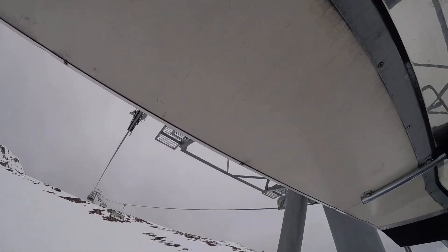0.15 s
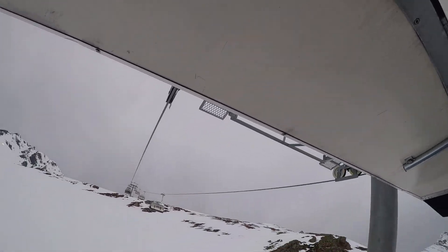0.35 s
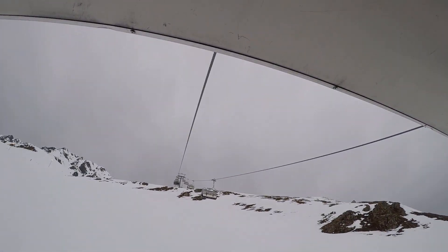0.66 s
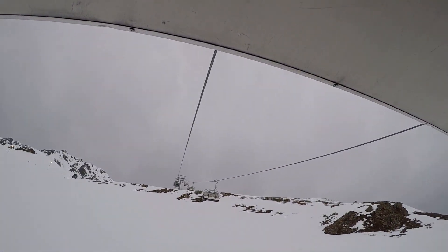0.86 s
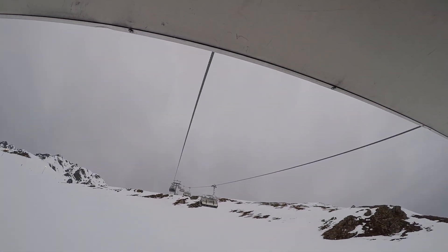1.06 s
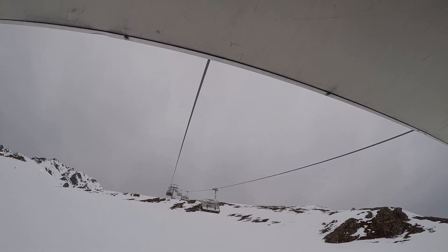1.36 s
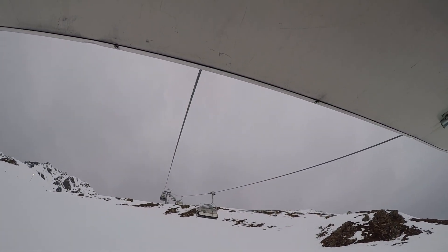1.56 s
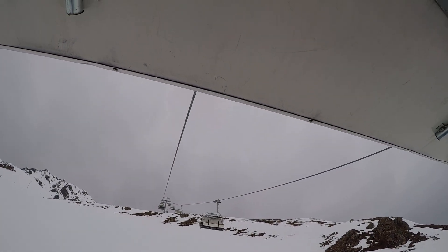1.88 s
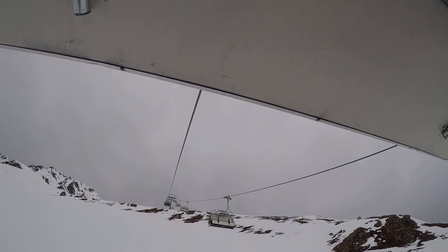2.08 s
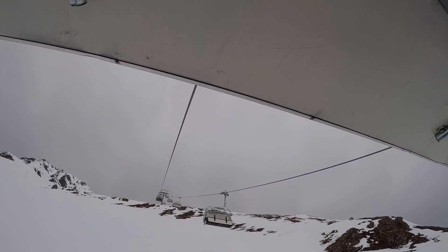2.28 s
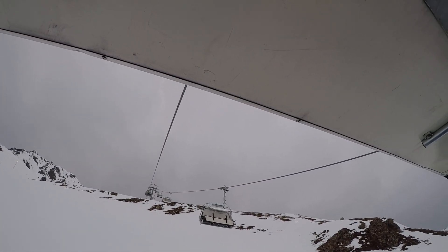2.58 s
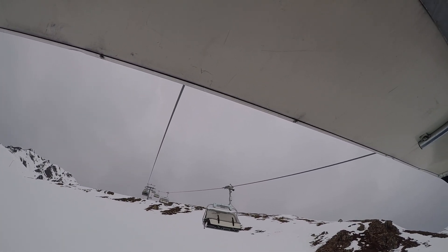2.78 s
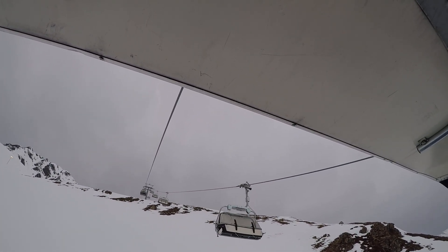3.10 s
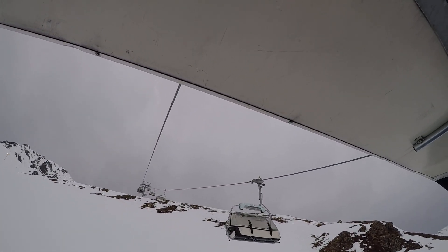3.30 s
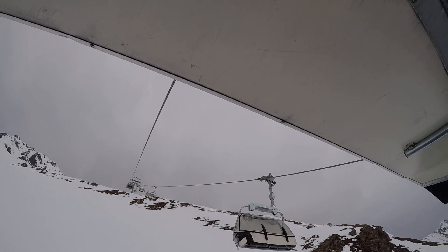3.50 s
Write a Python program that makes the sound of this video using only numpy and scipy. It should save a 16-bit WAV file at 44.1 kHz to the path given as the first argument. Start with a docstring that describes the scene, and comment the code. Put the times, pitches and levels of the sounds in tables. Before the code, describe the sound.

A chairlift chair, heard from the seat under its hood, rumbles over tower wheels with rushing noise, thuds and metallic rattles; after about 1.4 seconds it calms, snaps once, then hums faintly in open air.

```python
"""A chairlift chair is heard from its seat under the hood, shaken and rung by jolts over a tower's wheels.
Shaped noise makes the rush, rumble and air; loose fittings add rattles, ticks, pings and clanks.
Past the tower a fitting snaps once and the chair shudders.
Then the cable hums as a wavering sine in quiet open air, with a few faint squeaks of short rough tones."""
import sys
import numpy as np
from scipy import signal
from scipy.fft import rfft, irfft
from scipy.io import wavfile

SR = 44100
rng = np.random.default_rng(int(sys.argv[2]) if len(sys.argv) > 2 else 0)


def unload_wav(signal):
    """Save mono or channel-first audio to the path in sys.argv[1] as 16-bit WAV at rate SR, clipped to [-1, 1]."""
    wavfile.write(
        sys.argv[1],
        SR,
        np.round(np.clip(np.atleast_2d(signal).T, -1, 1) * 32767).astype(np.int16),
    )


N = 160965


def amp(db):
    """Turns decibels into gain."""
    return 10 ** (np.asarray(db) / 20)


def unit(x):
    """Scales a signal to rms 1."""
    return x / np.sqrt(np.mean(x ** 2) + 1e-20)


def read(points, hz):
    """Reads a table on a log-frequency axis."""
    f, value = np.transpose(points)
    return np.interp(np.log(hz + 1), np.log(f + 1), value)


def clock():
    """Gives the time of every sample in seconds."""
    return np.arange(N) / SR


def level(points):
    """Gives the gain that follows a level curve."""
    return amp(np.interp(clock(), *np.transpose(points)))


def drift(rate_hz):
    """Wanders at random with rms 1: noise under a Gaussian low-pass."""
    hz = np.fft.rfftfreq(N, 1 / SR)
    lowpass = np.exp(-(hz / rate_hz) ** 2)
    return unit(irfft(rfft(rng.standard_normal(N)) * lowpass, N))


def grain(rate_hz, depth_db):
    """Makes contact uneven: a random gain of rms 1."""
    return unit(amp(depth_db * np.clip(drift(rate_hz), -2, 2)))


def burst(start, length, rise, fall):
    """Shapes one event: linear attack, hold and exponential release, all in seconds."""
    t = clock() - start
    return np.clip(t / rise, 0, 1) * np.exp(-np.maximum(t - length, 0) / fall)


# Left-right likeness of the noise: f/Hz, correlation
STEREO_LIKENESS = [(130,.97),(300,.85),(600,.15),(1200,.15),(3000,.55),(8000,-.15)]
# Left-right balance of the noise: f/Hz, left minus right level/dB
STEREO_BALANCE = [(70,-1),(330,3.5),(1100,-2),(5000,1.5),(9000,-2.5)]


def noise(spectrum=None):
    """Makes stereo noise, white or coloured, from a shared mid and an opposed side."""
    hz = np.fft.rfftfreq(N, 1 / SR)
    mid, side = np.exp(2j * np.pi * rng.random((2, len(hz))))
    alike = np.clip(read(STEREO_LIKENESS, hz), -.99, .99)
    tilt_db = read(STEREO_BALANCE, hz) / 2
    mid, side = mid * np.sqrt(1 + alike), side * np.sqrt(1 - alike)
    bins = np.array([(mid + side) * amp(tilt_db), (mid - side) * amp(-tilt_db)])
    colour = 1 if spectrum is None else amp(read(spectrum, hz))
    return unit(irfft(bins * colour, N))


def ring(drive, modes):
    """Rings decaying modes (f/Hz, width/Hz, relative level/dB), keeping the power of a white drive."""
    t = np.arange(SR // 3) / SR
    response = np.zeros(len(t))
    for k, (hz, width, db) in enumerate(modes):
        decay = np.sqrt(width) * np.exp(-np.pi * width * t)
        # neighbouring modes alternate in sign
        response += (-1) ** k * amp(db) * decay * np.sin(2 * np.pi * hz * t)
    return signal.fftconvolve(drive, response[None] / np.linalg.norm(response), axes=1)[:, :N]


JOLT_RISE_S, JOLT_FALL_S = 0.0046, 0.01
THUD_DB, BUMP_DB, CHAIR_DB = -6.5, -14.5, -22.5
# Jolts that shake the chair: t/s, relative level/dB, length/s
JOLTS = [(0.093,-13,0.021),(.236,-11.5,0.0093),(0.267,-19,0.036),(0.465,-24.5,0.024),(0.52,-18.5,.014),(0.634,-12,0.021),(.68,-13.5,0.016),(.73,-8.5,.012),(0.771,-11.5,0.024),(0.817,-10.5,0.016),(.907,-14,.01),(0.949,-13.5,.018),(1.002,-16.5,0.013),(1.142,-20.5,0.015),(1.307,-21,0.022),(1.778,-22,0.033),(1.827,-20.5,0.023),(1.863,-29.5,0.049)]
# Colour of their thud: f/Hz, relative level/dB
THUD = [(60,-24),(130,-3),(330,2),(900,-14.5),(2500,-37),(10000,-78)]


def chair():
    """Each jolt lands as a firm falling bump with a rough thud, and rings the chair and its hood."""
    thud, blows = amp(THUD_DB) * noise(THUD), 0
    for start, db, length in JOLTS:
        strike = amp(db) * burst(start, length, JOLT_RISE_S, JOLT_FALL_S)
        blows = blows + strike * (thud + amp(BUMP_DB) * bump(start))
    return blows + amp(CHAIR_DB) * body(blows)


BUMP_TOP_HZ, BUMP_END_HZ, BUMP_GLIDE_S = 758, 213.2, 0.01664  # before each bump's random detune


def bump(start):
    """A blow travels through steel, high notes first: a tone that falls quickly."""
    t = np.maximum(clock() - start, 0)
    hz = BUMP_END_HZ + (BUMP_TOP_HZ - BUMP_END_HZ) * np.exp(-t / BUMP_GLIDE_S)
    detune = amp(rng.standard_normal() / 2)
    return np.sqrt(2) * np.sin(2 * np.pi * np.cumsum(hz * detune) / SR)


CHAIR_WIDTH_HZ, CHAIR_WIDTH_SHARE = 7, .02  # fixed width, plus a share of each pitch
# Resonances of the chair and hood: f/Hz, relative level/dB
CHAIR_MODES = [(118,-2),(198,6),(272,5),(325,3.5),(358,1.5),(553,-0.5),(1314,-4)]


def body(drive):
    """The chair and hood ring; higher modes are wider and die sooner."""
    return ring(drive, [(hz, CHAIR_WIDTH_HZ + CHAIR_WIDTH_SHARE * hz, db) for hz, db in CHAIR_MODES])


# Rush of the wheels: t/s, relative level/dB
RUSH_LEVEL = [(0,-23.5),(.5,-26.5),(.7,-24),(.95,-26),(1.17,-27),(1.25,-34),(1.35,-33),(1.39,-68)]
# Wheels rolling farther off: t/s, relative level/dB
ROLL_LEVEL = [(1.4,-37.5),(2.3,-45),(2.6,-39),(2.75,-50),(3.38,-41.5),(3.48,-46.5)]
# Colour of the rush: f/Hz, relative level/dB
RUSH = [(130,0),(330,-4),(800,-10.5),(5000,-28.5),(6400,-23.5),(8000,-31),(11000,-75)]
# Colour of the rolling: f/Hz, relative level/dB
ROLL = [(120,2),(300,-2),(1300,-13.5),(4500,-31),(6500,-25),(10000,-47)]


def wheels():
    """The cable rushes over the wheels, which roll on behind the chair; both also ring its body."""
    push = level(RUSH_LEVEL) * grain(rate_hz=74, depth_db=2.5)
    hiss = noise(RUSH) * grain(rate_hz=430, depth_db=1.0)
    shimmer = amp(-13.0) * noise(JINGLE) * grain(rate_hz=62, depth_db=2)
    roll = level(ROLL_LEVEL) * grain(rate_hz=70, depth_db=3.0)
    shaken_chair = body((amp(-5.5) * push + amp(-8.0) * roll) * noise())
    return push * (hiss + shimmer) + roll * noise(ROLL) + shaken_chair


RATTLE_RISE_S, RATTLE_FALL_S, TICK_FALL_S = 0.0029, 0.0065, 0.00082
TAIL_DB, TAIL_S = -19, 0.077  # quiet slow release under each rattle
JINGLE_DB, FITTINGS_DB = -5.5, -4.5
# Range and width of the modes of small metal parts
PART_LOW_HZ, PART_HIGH_HZ, PART_WIDTH_HZ = 1706, 8000, 67
# Rattles of loose fittings: t/s, relative level/dB, length/s, lower clatter's added level/dB
RATTLES = [(0.066,-30,0.028,-1),(0.175,-44.5,0.026,19),(0.209,-31,0.021,-1),(0.288,-28.5,0.025,1),(0.34,-23.5,0.016,-3),(0.429,-25.5,0.015,-4),(0.464,-32,0.038,-7),(0.527,-29,0.026,-7),(0.612,-22.5,0.0054,-9),(0.635,-27.5,0.05,0.5),(0.694,-28.5,0.028,-21),(0.766,-26,0.021,-1.5),(0.859,-47,0.015,24.5),(1.012,-28.5,0.011,-16),(1.075,-32,0.0077,-7),(1.12,-27.5,0.015,0),(1.273,-31.5,0.0047,1),(1.747,-26.5,0.0086,1.5),(1.838,-48.5,0.008,8),(2.201,-49.5,0.02,1.5),(2.327,-50,0.012,3.5)]
# Sharp ticks: t/s, level/dB
TICKS = [(0.034,-27.5),(.043,-22),(0.132,-27),(0.14,-21),(0.452,-23.5),(.461,-19.5),(0.717,-21),(1.126,-17),(1.751,-33)]
# Colour of bright jingling metal: f/Hz, relative level/dB
JINGLE = [(1000,-28),(3000,-13),(5000,-9.5),(6400,2.5),(7300,-3.5),(8500,-13.5),(10500,-21),(15000,-54)]
# Colour of the lower clatter: f/Hz, relative level/dB
CLATTER = [(200,19),(700,-1),(1400,7),(2300,4),(3500,0.5),(5000,-10),(9000,-49)]
# Colour of a tick: f/Hz, relative level/dB
TICK = [(300,-25),(1500,7.5),(6500,14.5),(8500,-5),(15000,-21)]


def fittings():
    """Loose metal chatters in short uneven noise bursts, each ringing another part, with sharp ticks."""
    bright, low = np.zeros((2, N))
    contact, white, rings = grain(rate_hz=127, depth_db=1.5), noise(), 0
    for start, db, length, clatter_db in RATTLES:
        shake = burst(start, length, RATTLE_RISE_S, RATTLE_FALL_S)
        shake = amp(db) * (shake + amp(TAIL_DB) * burst(start, length, RATTLE_RISE_S, TAIL_S))
        bright += shake
        low += shake * amp(clatter_db)
        pitches = rng.uniform(PART_LOW_HZ, PART_HIGH_HZ, size=14)
        part = [(hz, PART_WIDTH_HZ, read(JINGLE, hz)) for hz in pitches]
        rings = rings + ring(shake * contact * white, part)
    ticks = sum(amp(db) * burst(start, 0.0012, 0.00037, TICK_FALL_S) for start, db in TICKS)
    chatter = contact * (amp(JINGLE_DB) * bright * noise(JINGLE) + low * noise(CLATTER))
    return chatter + ticks * noise(TICK) + amp(FITTINGS_DB) * rings


PATTER_PER_S, PATTER_SPREAD_DB, PATTER_DB, PATTER_FALL_S = 220, 4, -11, .003


def patter():
    """The rush shakes small random pings out of the fittings, each a pair of fast-dying pitches."""
    out, t = np.zeros((2, N)), np.arange(SR // 50) / SR
    ping_db = PATTER_DB + PATTER_SPREAD_DB * np.minimum(rng.exponential(1, N), 2)
    strength = level(RUSH_LEVEL) * amp(ping_db)
    for i in np.flatnonzero(rng.random(N - len(t)) < PATTER_PER_S / SR):
        hz = rng.uniform(PART_LOW_HZ, PART_HIGH_HZ, size=(2, 1))
        modes = np.sin(2 * np.pi * hz * t) * np.exp(-t / PATTER_FALL_S)
        # each pitch gets its own random gain left and right
        out[:, i:i + len(t)] += strength[i] * rng.uniform(-0.39, 1, size=(2, 2)) @ modes
    return out


CLANK_S, CLANK_WIDTH_HZ = .008, 115
# Ringing clanks of the fittings: t/s, relative level/dB, f/Hz
CLANKS = [(0.433,-27,6240),(0.484,-28,3990),(0.526,-30.5,4180),(.648,-32,4400),(.784,-31.5,5320),(1.012,-28,4220),(1.316,-26,2410),(1.751,-32,6180)]


def clanks():
    """Metal knocks roughly on metal and rings briefly at one pitch, with any overtones up to 8 kHz."""
    scrape, out = noise() * grain(rate_hz=240, depth_db=3.5), 0
    for start, db, hz in CLANKS:
        modes = [(hz * k, CLANK_WIDTH_HZ, 0) for k in range(1, int(PART_HIGH_HZ / hz) + 1)]
        knock = amp(db) * burst(start, CLANK_S, RATTLE_RISE_S, RATTLE_FALL_S)
        out = out + ring(knock * scrape, modes)
    return out


RUMBLE_STEADY, LEFT_PHASE_RAD = 0.22, -0.26  # evening-out exponent, left phase against right
# Rumble of the chair: t/s, level/dB
RUMBLE_LEVEL = [(0,-12.5),(1.3,-13.5),(1.6,-20),(1.75,-15),(1.86,-16.5),(1.95,-20.5),(2.3,-23.5),(2.46,-18.5),(2.75,-29),(3.15,-25),(3.65,-28.5)]
# Colour of the rumble: f/Hz, relative level/dB
RUMBLE = [(4,-57),(15,-3),(30,-0.5),(50,-2.5),(70,-10.5),(100,-20),(300,-38.5),(800,-92)]


def rumble():
    """The hanging chair shakes deep and fairly even, swelling and dying away past the tower."""
    shake = signal.hilbert(noise(RUMBLE))
    # partly divide out the swings of the envelope
    shake = shake / (abs(shake).mean(0) + 0.47) ** RUMBLE_STEADY
    turn = np.exp(1j * LEFT_PHASE_RAD * np.array([[1], [0]]))
    return level(RUMBLE_LEVEL) * unit((shake * turn).real)


HUM_HZ, HUM_WAVER, OCTAVE_DB = 93.7, .011, -44  # waver: rms share of the pitch
# Cable hum: t/s, level/dB
HUM_LEVEL = [(1.95,-45),(2.15,-32.5),(2.8,-39),(2.98,-32),(3.65,-33.5)]


def cable():
    """The twisted cable hums on the wheels, wavering slightly, over a faint octave held throughout."""
    phase = 2 * np.pi * np.cumsum(HUM_HZ * (1 + HUM_WAVER * drift(rate_hz=10.3))) / SR
    hum = level(HUM_LEVEL) * np.sin(phase) * grain(rate_hz=14, depth_db=1.8)
    octave = amp(OCTAVE_DB) * np.sin(2 * phase) * grain(rate_hz=3.7, depth_db=1)
    return np.sqrt(2) * (hum + octave)


SQUEAK_HZ, SQUEAK_S, STRAND_S = 1628, .0068, .0428  # mean pitch, bell half-width, chirp spacing
SQUEAK_ROUGH_RAD, SQUEAK_ARCH_DB, SQUEAK_PAN_DB = .7, -6, 1.5
# Runs of faint squeaks: t/s, length/s, relative level/dB
SQUEAKS = [(1.527,.02,-50),(2.03,.07,-53),(2.462,.24,-41.5),(2.934,.02,-54),(3.062,.02,-52),(3.148,.07,-50),(3.234,.15,-47.5),(3.447,.02,-48),(3.614,.02,-49)]


def squeaks():
    """Rough chirps, in runs that swell and fade, perhaps one for each cable strand on a dry wheel."""
    out = np.zeros(N)
    wobble = SQUEAK_ROUGH_RAD * drift(rate_hz=90)
    for start, length, db in SQUEAKS:
        times = np.arange(start, start + length, STRAND_S)
        for s in times:
            t = clock() - s
            pitch = SQUEAK_HZ * (1 + 0.015 * rng.standard_normal())
            arch_db = SQUEAK_ARCH_DB * (2 * (s - times.mean()) / length) ** 2
            gain = amp(db + arch_db + 2 * rng.standard_normal())
            bell = np.exp(-(t / SQUEAK_S) ** 2 / 2)
            out += gain * bell * np.sin(2 * np.pi * pitch * t + wobble)
    return np.sqrt(2) * out * amp([[SQUEAK_PAN_DB / 2], [-SQUEAK_PAN_DB / 2]])


# Colour of the open air: f/Hz, relative level/dB
AIR = [(130,-10.5),(400,-29.5),(1000,-35),(4800,-42.5),(6800,-39.5),(10000,-41),(15000,-58.5)]


def air():
    """Open air hisses as steady coloured noise."""
    return amp(-45) * noise(AIR)


def scene():
    """Layers the chair, wheels and loose metal over rumble, cable and air."""
    tower = chair() + wheels() + fittings() + patter() + clanks()
    return tower + rumble() + cable() + squeaks() + air()


EDGE_HZ = 15000


def record(dry):
    """Limits the band with a steep low-pass."""
    lowpass = signal.firwin(511, EDGE_HZ, window=("kaiser", 9), fs=SR)
    return signal.oaconvolve(dry, lowpass[None], "same")


dry = scene()
out = record(dry)
unload_wav(out)
```